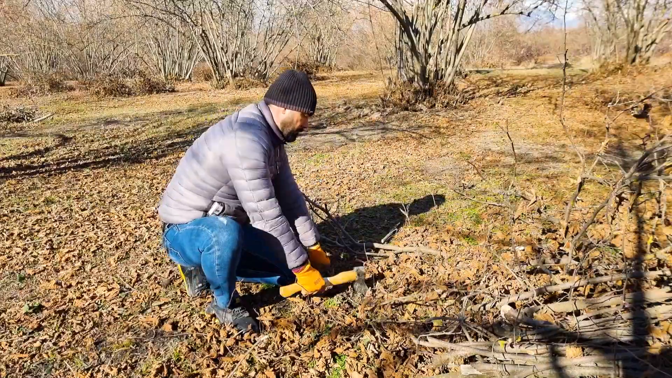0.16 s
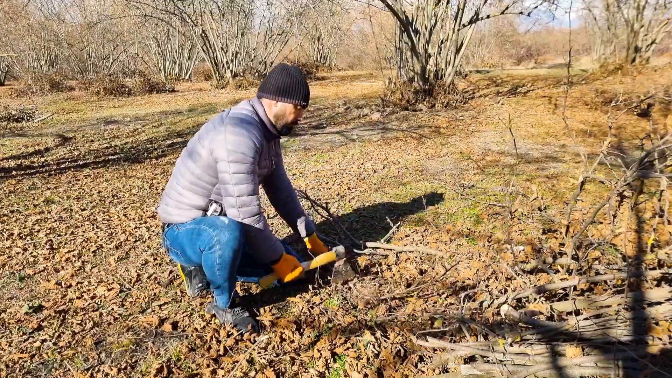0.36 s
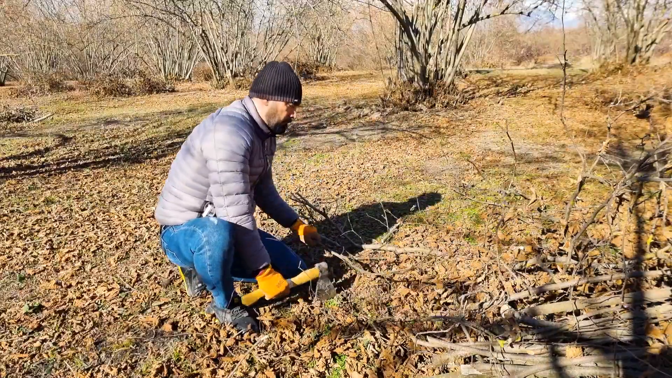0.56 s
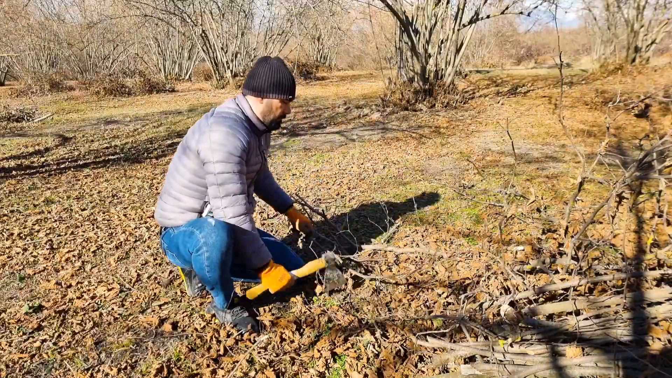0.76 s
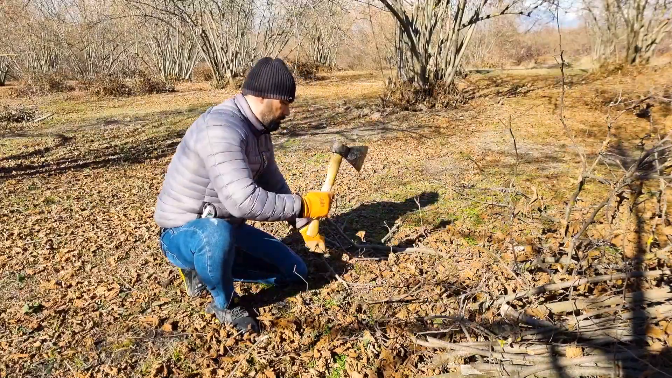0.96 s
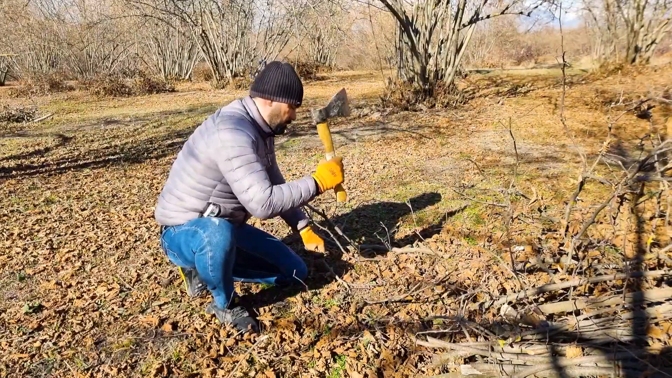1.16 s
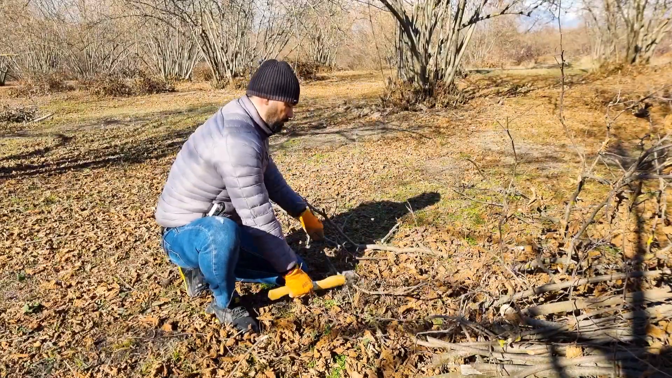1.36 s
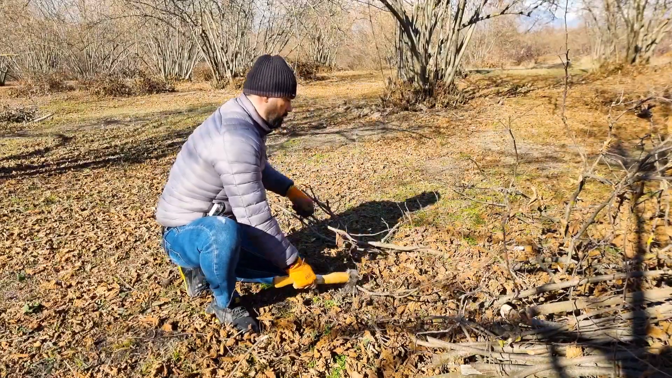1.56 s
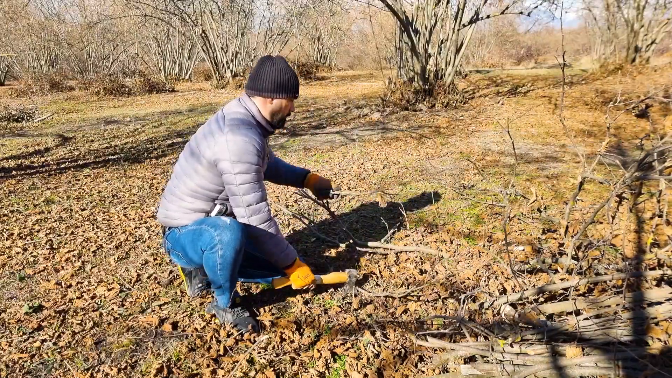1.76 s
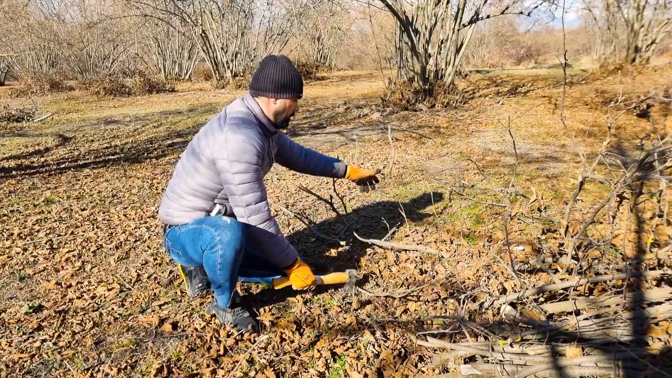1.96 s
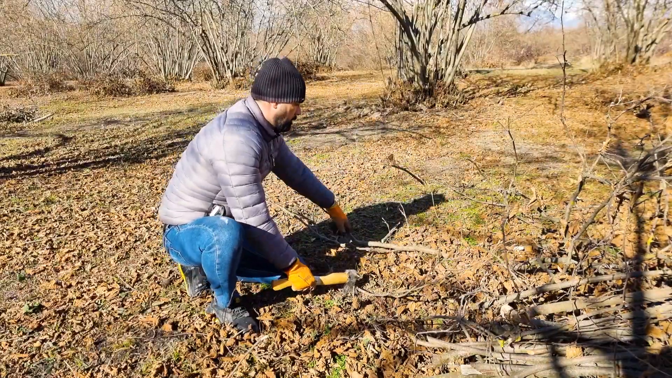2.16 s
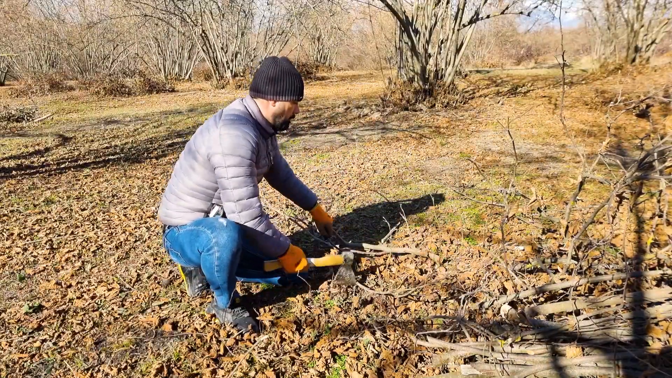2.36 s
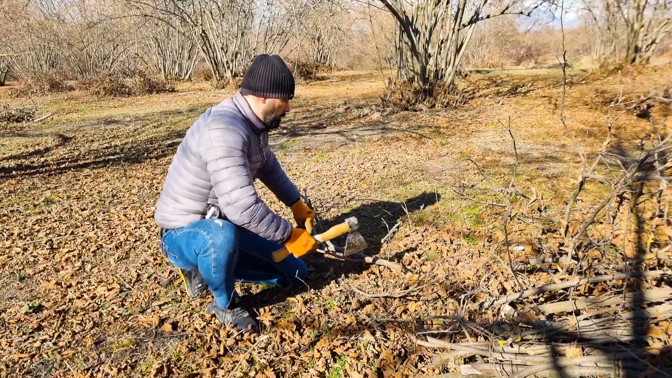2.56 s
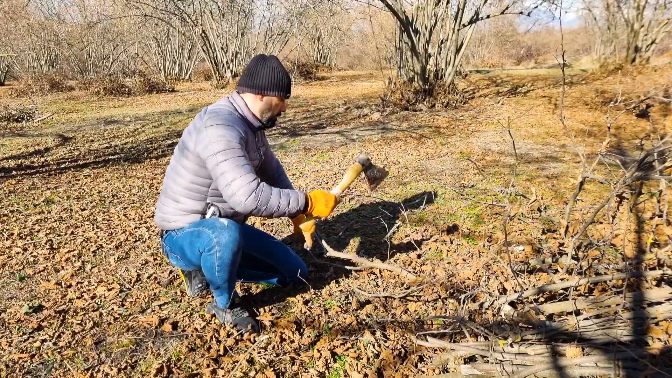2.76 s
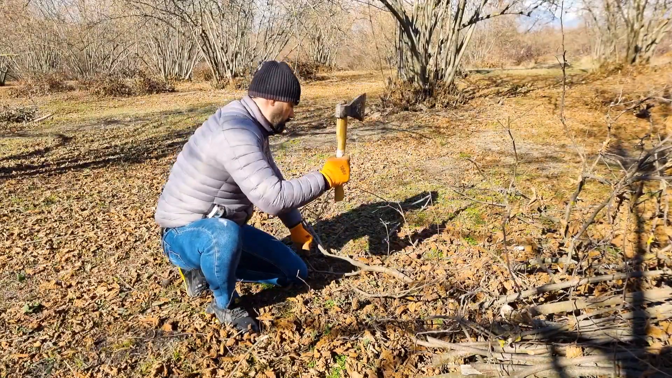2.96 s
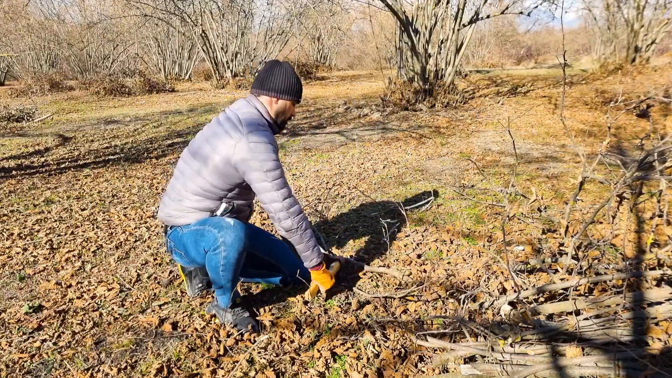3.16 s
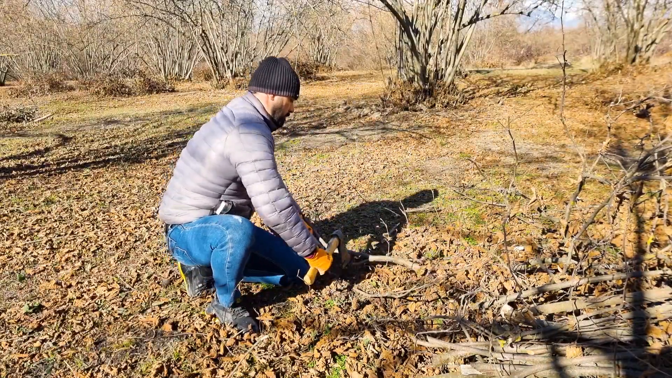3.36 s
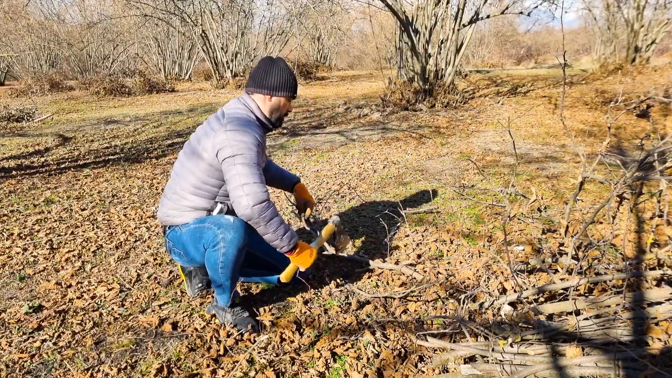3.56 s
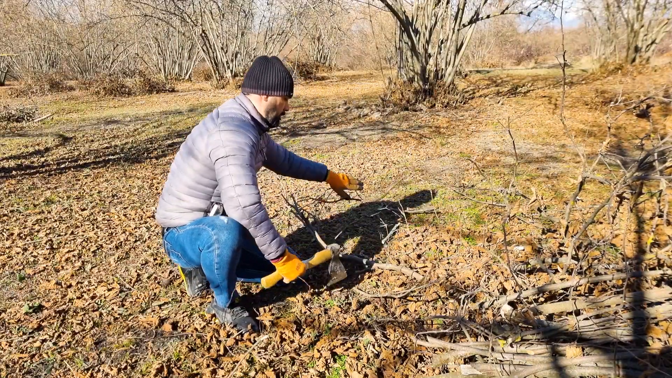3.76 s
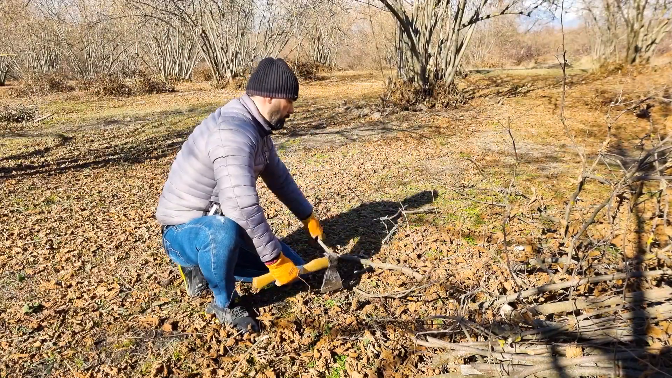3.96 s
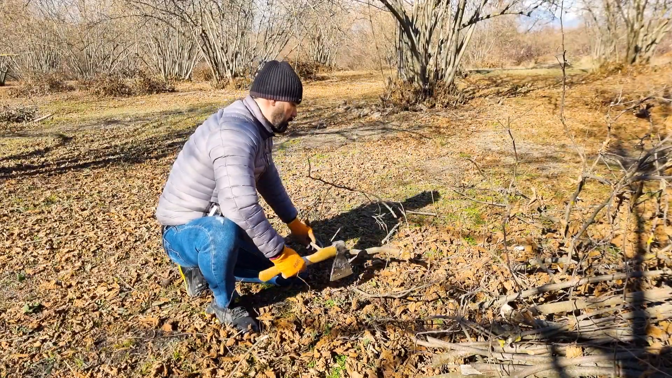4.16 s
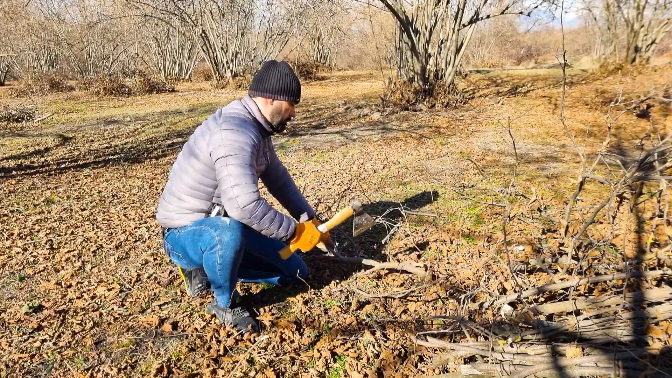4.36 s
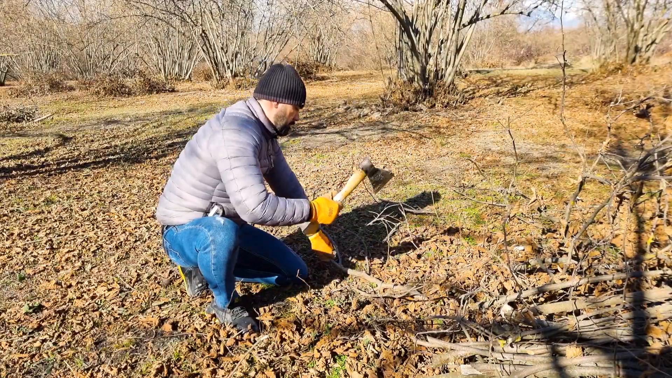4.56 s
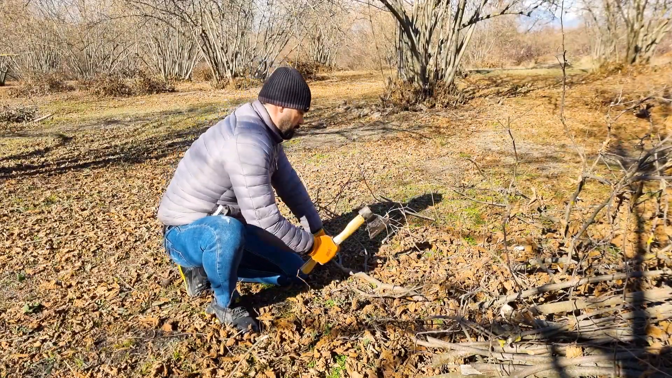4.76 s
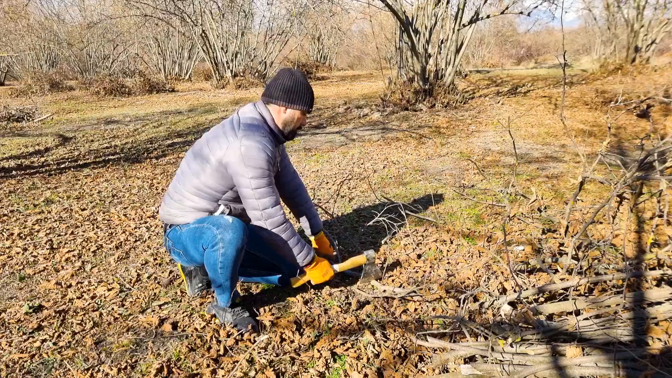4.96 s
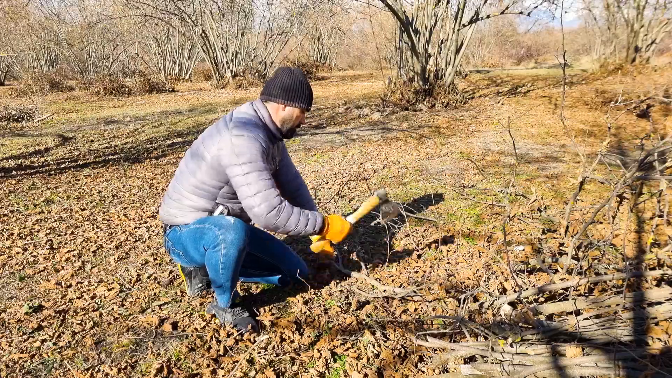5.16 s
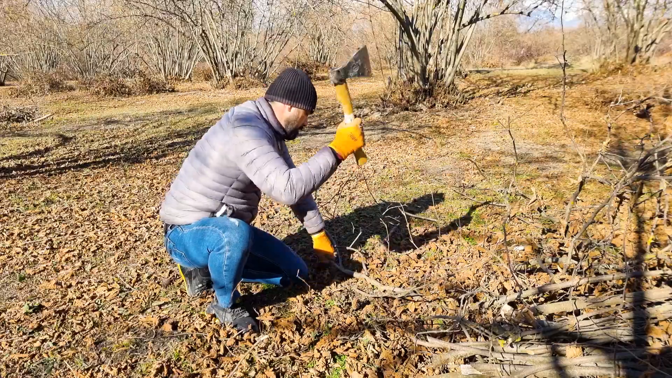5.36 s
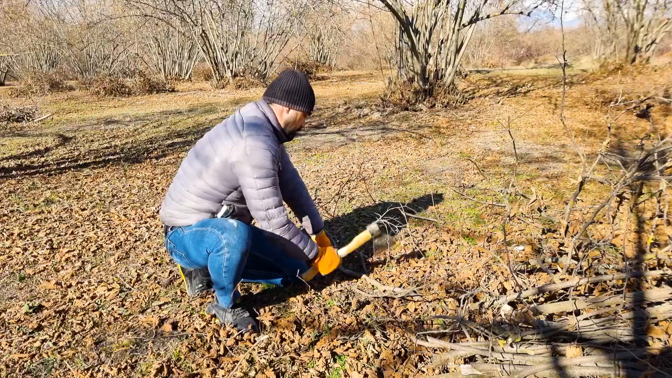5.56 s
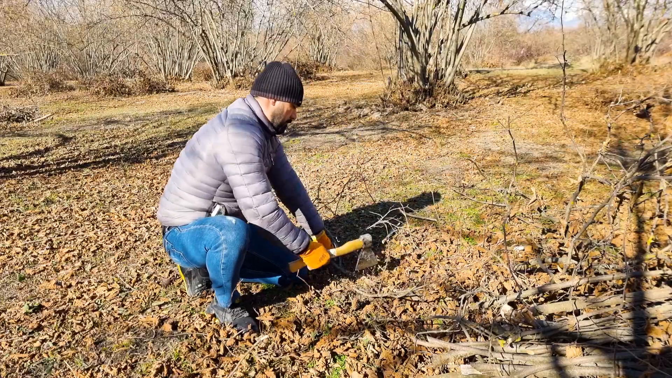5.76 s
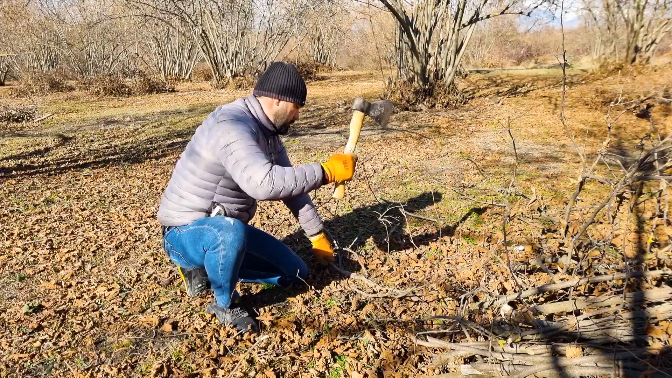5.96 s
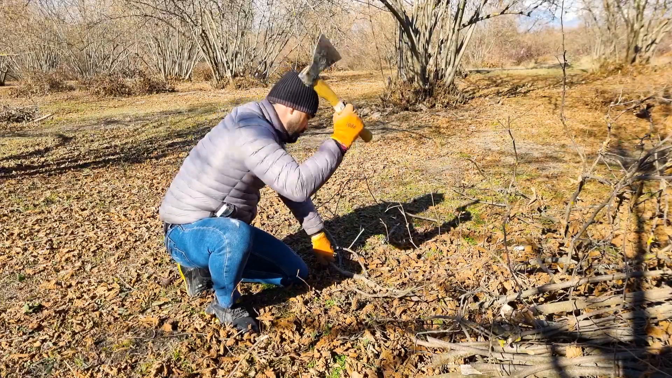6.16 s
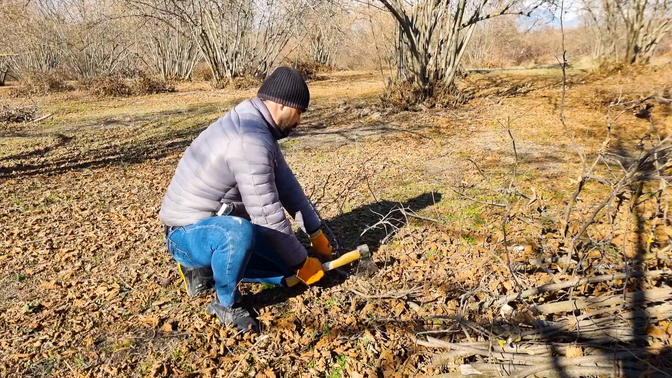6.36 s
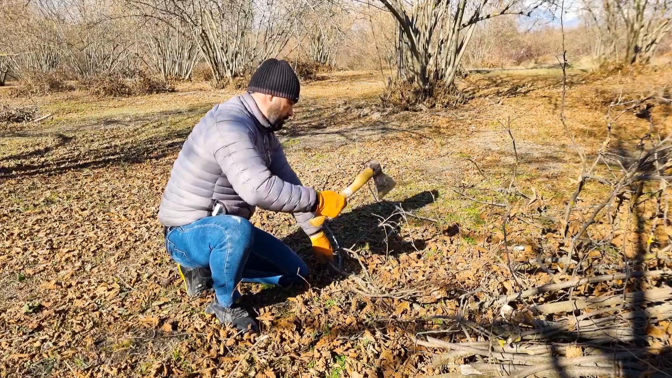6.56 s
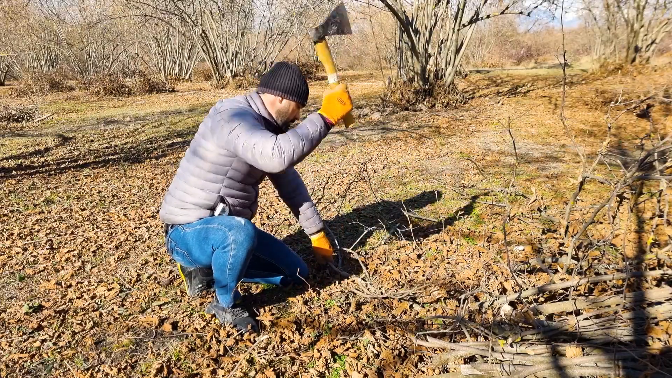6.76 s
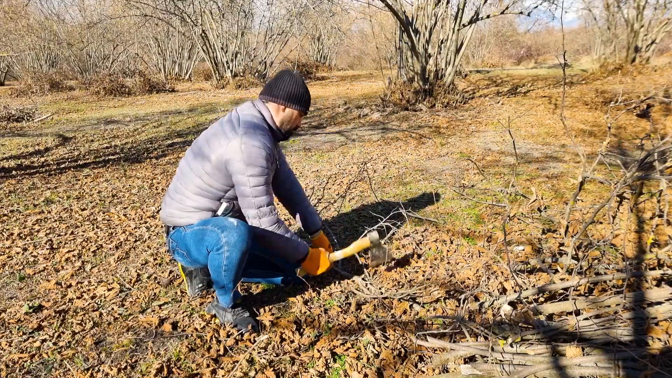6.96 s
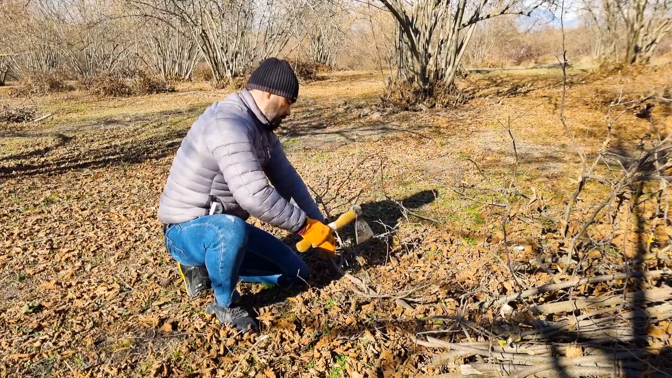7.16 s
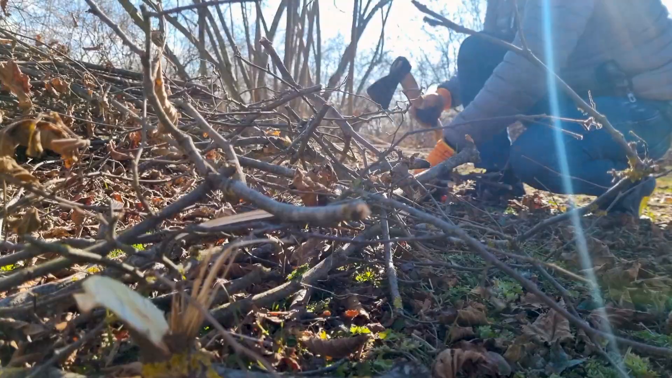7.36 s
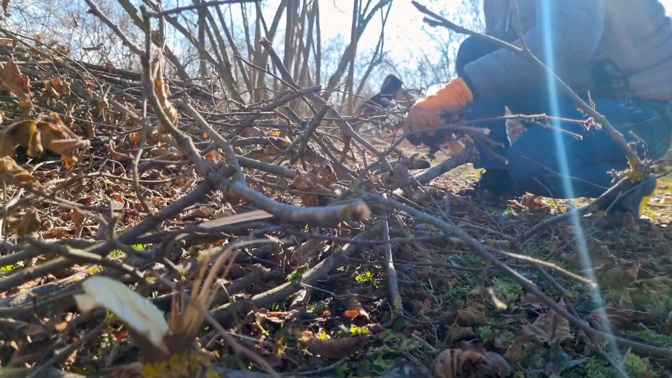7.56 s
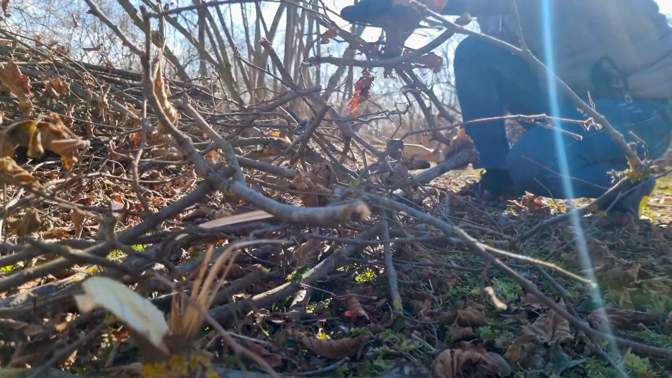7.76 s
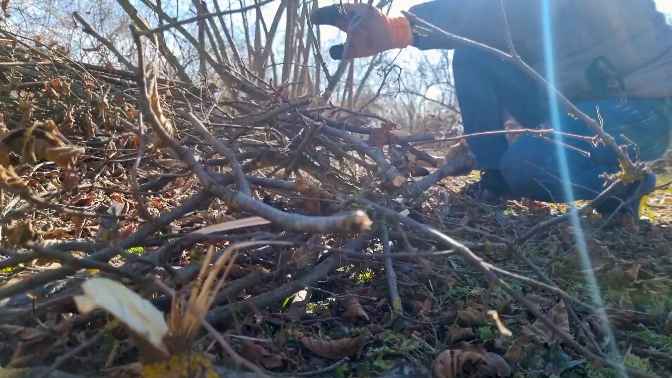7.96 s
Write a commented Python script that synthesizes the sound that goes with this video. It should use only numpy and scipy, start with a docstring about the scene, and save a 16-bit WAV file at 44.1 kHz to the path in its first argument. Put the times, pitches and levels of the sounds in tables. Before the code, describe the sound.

Seven sharp, uneven hatchet chops crack thin branches over soft soil thuds, with dry leaves crackling and twigs snapping between blows outdoors.

```python
"""Open air, dry leaf litter: a man crouches and chops thin branches with a hatchet, seven uneven blows.
Each blow layers fibre cracks and ringing modes of wood and steel over a soil thud and a shake of leaves.
In between he drags and sorts twigs: patchy grains crackle and scuff, small snaps click and ring.
Behind it lie shaped-noise rumble, hiss and breeze, and a faint far-off motor made of wavering sines.
There are no walls, only scatter off ground and brushwood; the work is nearer the left microphone port."""
import sys
import numpy as np
from scipy import signal
from scipy.fft import rfft, irfft, next_fast_len
from scipy.io import wavfile
from scipy.ndimage import uniform_filter1d

SR = 44100
rng = np.random.default_rng(int(sys.argv[2]) if len(sys.argv) > 2 else 0)


def file_out(sig):
    """Save sig as 16-bit WAV at sys.argv[1]."""
    # one column per channel
    cols = np.atleast_2d(sig).T
    # limit, then scale
    lim = np.clip(cols, -1, 1)
    pcm = np.round(lim * 32767).astype(np.int16)
    wavfile.write(sys.argv[1], SR, pcm)


N = 357033
T = np.arange(N) / SR
HIT_T = T[:SR // 2]  # time axis of one hit

# All levels are relative: the functions trim the layers, and filter spectra only set a shape.
# Open-air bed, spectrum: [f/Hz, level/dB]
AIR_SPECTRUM = [(20, -26.5), (40, -19.5), (65, 2), (90, -9.5), (150, -17), (290, -35.5), (420, -36),
                (550, -25), (700, -41), (1100, -36.5), (2000, -43.5), (6000, -51.5), (9000, -70),
                (16000, -78.5)]
# Breeze on the microphone: [t/s, level/dB]
BREEZE = [(0, -74), (3.8, -80), (4.1, -69), (4.4, -80), (6.3, -72), (6.75, -60.5), (7.3, -65.5), (7.7, -57),
          (8.1, -56)]
# Distant motor: [t/s, pitch f/Hz, fundamental level/dB, third harmonic level/dB]
MOTOR = [(0, 176.2, -67, -71.5), (.6, 174, -73, -76.5), (1.15, 180, -71.5, -79), (1.35, 194, -91, -79.5),
         (1.6, 199, -91, -77), (2.15, 191, -91, -73.5), (2.35, 176, -89.5, -81.5), (3.8, 172.3, -92, -87.5),
         (4.4, 180, -85, -74), (4.75, 185, -88.5, -75.5), (5.2, 181.8, -96, -89.5), (8.1, 179, -92, -86.5)]

# The hand gathers, drags or lays down branches:
# [start t/s, length t/s, crisp leaves level/dB, dull scuffing level/dB]
MOVES = [(-0.07, 0.29, -59, -70.5), (0.262, 0.4, -55, -66), (0.703, .13, -64.5, -78),
         (0.839, .17, -52, -62.5), (1.078, 0.16, -70.5, -79), (1.336, .2, -57.5, -67),
         (1.632, 0.15, -71.5, -82), (1.871, 0.17, -62, -65.5), (2.275, .2, -51.5, -61.5),
         (2.54, 0.061, -56, -69.5), (2.66, 0.48, -58.5, -76), (2.884, .16, -58, -70),
         (3.23, 0.36, -62, -72.5), (3.62, 0.16, -74.5, -75.5), (3.851, 0.032, -67, -64.5),
         (3.97, .05, -53.5, -67), (4.174, 0.11, -53, -62.5), (4.33, 0.31, -56, -66),
         (4.883, 0.055, -62, -76), (5.657, .26, -66.5, -74), (6.201, 0.18, -74, -71.5),
         (6.339, .21, -62.5, -72.5), (6.855, 0.18, -71, -70.5), (7.069, 0.18, -59, -68.5),
         (7.318, 0.19, -62, -70), (7.467, 0.22, -56, -67.5), (7.794, 0.074, -56.5, -55),
         (7.83, 0.31, -51, -61.5)]
# A move takes hold, eases off, and the leaves settle
MOVE_ATTACK_S, MOVE_SAG_DB_PER_S, MOVE_T60_S = 0.064, 19.5, 0.44
REST_CRISP_DB, REST_SCUFF_DB = -83, -85  # the litter under a crouching man
# Quick swishes of a branch through the leaves: [t/s, level/dB, half length t/s]
SWEEPS = [(0.625, -44, 0.015), (1.323, -43.5, 0.011), (3.467, -50.5, 0.021), (4.451, -39, 0.013),
          (6.385, -51.5, 0.012), (7.091, -48, 0.013)]
# Crisp leaves, spectrum: [f/Hz, level/dB]
LEAF_SPECTRUM = [(700, -28), (1200, -18), (2000, -9), (2500, -5), (3050, 1), (3500, -1.5), (4600, -3.5),
                 (5200, 0.5), (6000, -3.5), (6900, -8), (8100, -25.5), (14500, -9.5), (16000, -20)]
# Dull scuffing, spectrum: [f/Hz, level/dB]
SCUFF_SPECTRUM = [(120, -22), (280, -14), (450, -3), (1100, 0), (1900, -3), (3500, -13), (8000, -40.5)]

# Twigs snap and knock together: [t/s, level/dB, ring f/Hz, woody band level/dB, decay t60/s]
TWIGS = [(0.145, -44, 3880, -1.5, 0.071), (0.333, -32, 4100, -4, 0.071), (1.312, -32.5, 5240, -19, .025),
         (1.71, -47, 5300, -12, 0.04), (1.809, -52.5, 5070, -14, 0.033), (1.967, -34, 2660, 3.5, 0.032),
         (2.078, -46, 1370, 8.5, 0.026), (2.214, -47.5, 5240, -6.5, 0.16), (2.291, -49, 2730, -16, 0.06),
         (2.685, -43.5, 5720, -11.5, 0.084), (2.998, -38, 5520, -10, 0.035), (3.363, -40.5, 5400, -20, .03),
         (3.517, -41.5, 1210, -30, 0.1), (3.718, -49, 4830, -10, .03), (3.887, -40, 2770, -36, 0.093),
         (4.024, -35, 5720, -11.5, 0.017), (4.108, -45, 3070, -12, 0.068), (4.351, -42.5, 2700, -4.5, .045),
         (4.451, -37.5, 2980, -1.5, .061), (4.636, -38.5, 5320, -40, 0.11), (4.932, -48, 5130, 13, 0.039),
         (5.154, -49.5, 5060, -14.5, 0.058), (5.898, -45.5, 5020, -25, .029), (6.157, -55, 4180, -34, .036),
         (6.217, -48.5, 3220, -23, .025), (7.416, -44.5, 4220, -25, 0.047), (7.597, -33, 3400, -12, .05),
         (7.649, -36.5, 3220, -9.5, 0.2), (7.816, -42.5, 3560, -3, .03), (7.844, -31.5, 3350, -1.5, .061),
         (7.861, -26.5, 5330, -9, 0.034), (7.975, -30.5, 3920, -14, 0.073),
         (8.058, -27.5, 5230, -19, 0.045)]
# Thin twig snap, spectrum: [f/Hz, level/dB]
TWIG_SPECTRUM = [(150, -18), (400, -39.5), (1500, -2), (3000, 1.5), (5800, 3), (8300, -34.5), (15500, -2.5)]
# Knock of thicker sticks, spectrum: [f/Hz, level/dB]
KNOCK_SPECTRUM = [(80, -8), (250, -9), (500, 5.5), (1200, 5.5), (2400, 0), (5000, -5), (15000, -57.5)]

# Every blow bites the branch, breaks through it and lands in the soil:
# [t/s, bite level/dB, splitting time t/s, break after t/s, break level/dB, branch ring level/dB,
#  cut piece f/Hz, cut piece level/dB, stub f/Hz, stub level/dB, thud level/dB, thud f/Hz,
#  rebound level/dB, leaves level/dB, leaves decay t60/s]
CHOPS = [(0.1904, -7.5, .0056, 0.004, -4.5, -26, 1310, -22, 430, -22.5, -17.5, 175, -1.5, -30.5, 0.28),
         (1.3265, -7, 0.0051, 0.0024, -10, -17, 2100, -23, 353, -21.5, -17, 200, -10, -36, 0.22),
         (3.1625, -12, .0086, .0056, -3, -26.5, 1547, -24.5, 408, -21.5, -19.5, 175, -11, -36, 0.22),
         (4.8539, -19.5, 0.0051, 0.0055, -7.5, -22, 1012, -19.5, 520, -29, -32.5, 150, -10.5, -41.5, 0.28),
         (5.6134, -2.5, 0.0036, 0.0037, -2, -15.5, 1000, -14, 415, -19, -13.5, 124, -10, -37.5, 0.24),
         (6.3202, -5.5, .0075, 0.004, -12, -13.5, 803, -20, 499, -9, -14, 100, -4, -41, 0.27),
         (7.0088, -2.8, 0.0025, .0043, -20, -18.5, 801, -12, 393, -13.5, -10.5, 120, -8.5, -45.5, 0.28)]
BREAK_SHARE = 0.67  # the break takes this share of the splitting time
SINK_S, REBOUND_S = 0.0055, 0.013  # from the break to the soil, and from there to the rebound
# Tearing wood fibres, spectrum: [f/Hz, level/dB]
SNAP_SPECTRUM = [(150, -15), (310, -9.5), (430, 5.5), (1000, -0.5), (2000, -0.5), (3000, 1), (4200, -1.5),
                 (5600, 1), (7000, -11.5), (8300, -24.5), (11000, -16), (15500, -13)]
# Modes of the struck branch: [f/Hz, level/dB, decay t60/s]
BRANCH_MODES = [(483, -7.5, 0.031), (537, -6.5, 0.035), (710, -5, 0.03), (810, 0.5, 0.019),
                (1060, -8, 0.013), (1360, -11.5, 0.013), (1950, 3, 0.024), (2886, -2, 0.021)]
# Modes of the steel head: [f/Hz, level against the snap/dB, decay t60/s]
HEAD_MODES = [(3045, -34.5, 0.064), (4180, -37, 0.1), (5060, -36.5, 0.05), (5530, -44, 0.03),
              (5540, -41, .08), (6800, -44, 0.07)]
# Cut piece, ringing like a free bar: [multiple of its pitch, level/dB, decay t60/s]
PIECE_MODES = [(1, 0.5, 0.019), (2.76, 3, .014)]
# Stub left in the hand: [multiple of its pitch, level/dB, decay t60/s]
STUB_MODES = [(1, -0.5, .022), (1.87, -3, 0.013)]
WOOD_LOSS_DB_PER_HZ = 0.004  # overtones weaken the further they lie above the pitch
# Wobble modes of the turf: [f/Hz, level/dB, decay t60/s]
SOIL_MODES = [(64.6, -18.5, .28), (85, -18.5, 0.23), (142.5, -24.5, 0.18), (221, -16.5, 0.095)]
THUD_LOW_HZ, THUD_HIGH_HZ = 46, 277.9

# Sound returning from ground and brushwood, spectrum: [f/Hz, level/dB]
SCATTER_SPECTRUM = [(100, -31), (500, -20), (2000, -16.5), (5000, -19), (9000, -18), (15000, -16.5)]
SCATTER_T60_S = 0.11
# Balance of the two ports: [f/Hz, left minus right level/dB]
PORT_BALANCE = [(60, -5.5), (130, 2.4), (240, 4), (370, 8), (800, 6.5), (1300, 8), (2400, 13), (4400, 17.5),
                (8000, 20.5), (11000, 15), (14500, 7)]
TOP_HZ = 16200


def undb(db):
    """Decibels to gain."""
    return 10 ** (np.asarray(db) / 20)


def unit(x):
    """Scale to rms 1."""
    return x / np.sqrt(np.mean(x ** 2))


def curves(table):
    """The columns of a time table, joined by straight lines."""
    s, *columns = np.transpose(table)
    return [np.interp(T, s, column) for column in columns]


def gains(points, size):
    """A spectrum of (Hz, dB) points as gains on the bins of an FFT."""
    hz, db = np.transpose(points)
    log_bins = np.log(np.fft.rfftfreq(size, 1 / SR) + 1)
    return undb(np.interp(log_bins, np.log(hz), db))


def colour(x, points, size=4096):
    """Causal minimum-phase filter of unit energy with the given spectrum."""
    cepstrum = irfft(np.log(gains(points, size)))
    # folding the cepstrum forward in time makes the response causal
    cepstrum[1:size // 2] *= 2
    cepstrum[size // 2 + 1:] = 0
    response = irfft(np.exp(rfft(cepstrum)))
    return signal.oaconvolve(x, response / np.linalg.norm(response))[:len(x)]


def add(track, s, sound):
    """Mix a sound in at time s."""
    i = max(int(s * SR), 0)
    track[i:i + len(sound)] += sound[:max(N - i, 0)]


def fade(t60):
    """Exponential decay over one hit, down 60 dB after t60 seconds."""
    return np.exp(-np.log(1000) * HIT_T / t60)


def ring(hz, t60):
    """One struck mode: a decaying sine."""
    return np.sin(2 * np.pi * hz * HIT_T) * fade(t60)


def resonate(x, hz, width_hz):
    """One resonance with gain 1 at its centre."""
    return signal.lfilter(*signal.iirpeak(hz, hz / width_hz, fs=SR), x)


def walk(rate):
    """Smooth random drift with a spread near 1, taking a new value `rate` times a second."""
    k = int(SR / rate)
    steps = np.repeat(rng.standard_normal(N // k + 1), k)
    return unit(uniform_filter1d(uniform_filter1d(steps, k), k)[:N])


def grains(size, per_s, spread_db):
    """Tiny fractures at random moments, most faint and a few strong; rms 1."""
    present = rng.random(size) < per_s / SR
    strength = np.minimum(rng.exponential(size=size), 5)
    return unit(present * rng.choice([-1, 1], size) * undb(spread_db * strength))


def outdoors():
    """Distant rumble, a trace of hiss and puffs of breeze, all from shaped noise."""
    air = undb(-71) * colour(rng.standard_normal(N), AIR_SPECTRUM)
    puff_spectrum = [(15, -8), (32, -2.5), (70, 0.5), (130, -22.5), (300, -35.5), (1500, -79)]
    puffs = colour(rng.standard_normal(N), puff_spectrum)
    breeze_db = curves(BREEZE)[0] + 2 * walk(2.2)
    return air + undb(breeze_db) * puffs


def motor():
    """A far motor whose partials waver and fade on the way, over a low steady drone."""
    hz, first_db, third_db = curves(MOTOR)
    phase = 2 * np.pi * np.cumsum(hz * (1 + 0.012 * walk(35))) / SR
    first = undb(first_db + 2 * walk(9)) * np.sin(phase)
    third = undb(third_db + 4 * walk(40)) * np.sin(3 * phase)
    drone_level = undb(-67.5 + 2 * walk(3.7))
    drone_phase = 2 * np.pi * np.cumsum(71 + 3 * walk(3)) / SR
    return undb(-1.5) * (first + third) + drone_level * np.sin(drone_phase)


def handling():
    """Strength of crackling and of scuffing: every move swells, sags while it lasts and dies away."""
    crisp, scuff = undb(REST_CRISP_DB), undb(REST_SCUFF_DB)
    for s, length_s, crisp_db, scuff_db in MOVES:
        age = T - s
        attack = np.clip(age / MOVE_ATTACK_S, 0, 1)
        sag_db = MOVE_SAG_DB_PER_S * np.clip(age, 0, length_s)
        release = np.exp(-np.log(1000) * np.maximum(age - length_s, 0) / MOVE_T60_S)
        effort = attack * undb(-sag_db) * release
        crisp = np.hypot(crisp, undb(crisp_db) * effort)
        scuff = np.hypot(scuff, undb(scuff_db) * effort)
    return crisp, scuff


def crackle(count):
    """Single leaves and stalks pop as short noise bursts, each at a pitch of its own; rms 1."""
    out, t = np.zeros(N), T[:SR // 50]
    for when, pitch, strength, length in rng.random((count, 4)):
        pop = rng.standard_normal(len(t)) * np.exp(-t / (0.00063 + 0.002 * length))
        pop = resonate(pop, 2400 + 4200 * pitch, width_hz=700)
        add(out, when * N / SR, undb(13 * strength ** 2) * pop)
    return unit(out)


def patchy(x, patchy_db):
    """Ever-changing resonances: each leaf and stalk that moves has its own colour for a moment."""
    _, _, cells = signal.stft(x, nperseg=1024)
    field = rng.standard_normal(cells.shape)
    field = uniform_filter1d(field, size=5, axis=0)  # blur across frequency
    field = uniform_filter1d(field, size=6, axis=1)  # blur across time
    return unit(signal.istft(cells * undb(patchy_db * unit(field)))[1][:N])


def landings():
    """The head meets the soil after each break: (s, thud dB, thud Hz, rebound dB, leaves dB, t60 s)."""
    return [(s + break_s + SINK_S, *landing)
            for s, _, _, break_s, _, _, _, _, _, _, *landing in CHOPS]


def litter():
    """Dry leaves crackle and scuff when handled, swept or shaken by a blow; each port hears other leaves."""
    crushed, dragged = handling()
    shaken = sum(undb(db) * np.exp(-((T - s) / half_s) ** 2 / 2) for s, db, half_s in SWEEPS)
    for s, *_, leaves_db, t60 in landings():
        add(shaken, s, undb(leaves_db) * fade(t60))
    catching = undb(2.6 * walk(60))  # leaves catch and let go
    crisp = np.hypot(crushed * catching, shaken)
    scuff = np.hypot(undb(4) * dragged * catching, undb(-7) * shaken)
    sides = []
    for _ in range(2):
        pops = undb(-5.5) * crackle(count=550)
        crumbling = patchy(grains(N, per_s=6000, spread_db=3.5), patchy_db=3.2)
        rubbing = patchy(grains(N, per_s=2500, spread_db=3), patchy_db=4)
        crisp_leaves = colour(crisp * crumbling, LEAF_SPECTRUM)
        dull_scuffing = colour(scuff * rubbing, SCUFF_SPECTRUM)
        sides.append(crisp_leaves + crushed * pops + dull_scuffing)
    return np.array(sides)


def twigs():
    """Small dry snaps: a first click, then splinters in the twig's own resonance; thicker sticks also knock."""
    ticks, knocks, rings = np.zeros((3, N))
    for s, db, hz, woody_db, t60 in TWIGS:
        splinters = grains(len(HIT_T), per_s=3500, spread_db=3)
        burst = splinters * (fade(t60) + 1.3 * fade(0.0017))
        burst /= np.linalg.norm(burst)
        burst[0] += 0.6  # the first click
        burst *= undb(db + 5.5)
        thin = np.sqrt(max(1 - undb(woody_db) ** 2, 0.1))  # what the woody band leaves over
        add(ticks, s, undb(8) * burst * thin)
        add(knocks, s, undb(7 + woody_db) * burst)
        add(rings, s, undb(23.5) * thin * resonate(burst, hz, width_hz=120))
    return colour(ticks, TWIG_SPECTRUM) + colour(knocks, KNOCK_SPECTRUM) + rings


def stick(modes, hz):
    """A struck length of wood whose modes are multiples of its pitch."""
    out = 0
    for multiple, db, t60 in modes:
        loss_db = WOOD_LOSS_DB_PER_HZ * hz * (multiple - 1)
        out = out + undb(db - loss_db) * ring(hz * multiple, t60)
    return out


def cracks():
    """Fibres tear in two bursts, bite and break; branch, cut piece, stub and steel head ring briefly."""
    tearing, rings = np.zeros((2, N))
    head = sum(undb(db) * ring(hz, t60) for hz, db, t60 in HEAD_MODES)
    for (s, bite_db, split_s, break_s, break_db, ring_db,
         piece_hz, piece_db, stub_hz, stub_db, *_) in CHOPS:
        bite = (s, bite_db, split_s)
        snap = (s + break_s, break_db, BREAK_SHARE * split_s)
        for when, snap_db, length_s in (bite, snap):
            # a dense split with a faint tail of late fibres
            envelope = np.exp(-(HIT_T / length_s) ** 2) + undb(-21) * fade(0.073)
            burst = grains(len(HIT_T), per_s=15000, spread_db=3) * envelope
            add(tearing, when, undb(snap_db + 6) * burst / np.linalg.norm(burst))
            add(rings, when, undb(snap_db) * head)
        # the hand grips at a new place each time, which shifts the modes a little
        shift = 1 + 0.0091 * rng.standard_normal(len(BRANCH_MODES))
        branch = sum((-1) ** k * undb(db) * ring(hz * shift[k], t60)
                     for k, (hz, db, t60) in enumerate(BRANCH_MODES))
        piece = stick(PIECE_MODES, piece_hz)
        add(rings, s, undb(ring_db - 5.5) * branch + undb(piece_db) * piece)
        add(rings, s + break_s, undb(stub_db) * stick(STUB_MODES, stub_hz))
    return colour(tearing, SNAP_SPECTRUM) + rings


def thuds():
    """The soil is pushed down and springs back, the head rebounds once and the turf wobbles on."""
    out, lead_s = np.zeros(N), 0.01  # room for the pulse to build up before its centre
    for s, db, hz, rebound_db, *_ in landings():
        angle = 2 * np.pi * hz * (HIT_T - lead_s)
        push = -angle * np.exp((1 - angle ** 2) / 2)
        settle = (HIT_T - lead_s - REBOUND_S) / 0.0027
        rebound = (1 - settle ** 2) * np.exp(-settle ** 2 / 2)
        add(out, s - lead_s, undb(db) * (push + undb(rebound_db) * rebound))
        # a heavier blow sinks deeper and shakes disproportionately more turf
        turf = sum(undb(mode_db) * ring(mode_hz, t60) for mode_hz, mode_db, t60 in SOIL_MODES)
        add(out, s, -undb(1.4 * db + 5.5) * turf)
    # a small patch of soft ground radiates neither deep bass nor treble
    band = signal.butter(3, [THUD_LOW_HZ, THUD_HIGH_HZ], "band", fs=SR, output="sos")
    return signal.sosfiltfilt(band, out)


def brushwood(x):
    """The direct sound, a little late on the left, and its scatter off ground and twigs."""
    size = len(HIT_T)
    late = np.exp(-2j * np.pi * np.fft.rfftfreq(N, 1 / SR) * 5e-5)  # 50 microseconds
    direct = np.array([irfft(rfft(x) * late, N), x])
    echoes = rng.standard_normal((2, size)) * fade(SCATTER_T60_S) * (1 - fade(0.006))
    echoes /= np.linalg.norm(echoes, axis=1, keepdims=True)
    echoes = irfft(rfft(echoes) * gains(SCATTER_SPECTRUM, size), size)[:, :size // 2]
    scatter = signal.oaconvolve(x[None], echoes, axes=1)[:, :N]
    # the shaded right port hears a larger share of scatter
    return direct + undb([[0], [7]]) * scatter


def ports(pair):
    """The right port faces away from the work and loses middle and treble."""
    size = next_fast_len(N + SR // 10)
    ratio = gains(PORT_BALANCE, size)
    # the two gains always add up to 2
    balance = 2 / (1 + np.array([1 / ratio, ratio]))
    return irfft(rfft(pair, size) * balance, size)[:, :N]


def scene():
    """Everything as it reaches the two ports; the litter lies too close to scatter."""
    through_brushwood = cracks() + thuds() + twigs() + motor() + outdoors()
    return ports(brushwood(through_brushwood) + litter())


def record(dry):
    """Soft saturation rounds the highest peaks and a steep low-pass cuts the top."""
    rounded = 0.85 * np.tanh(dry / 0.85)
    low_pass = signal.ellip(10, 0.2, 80, TOP_HZ, fs=SR, output="sos")
    return signal.sosfilt(low_pass, rounded)


dry = scene()
out = record(dry)
file_out(out)
```